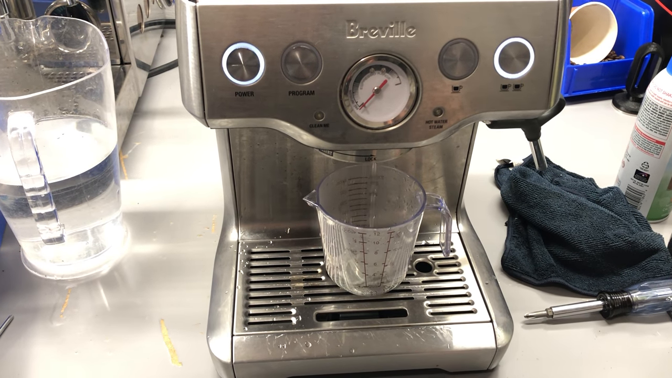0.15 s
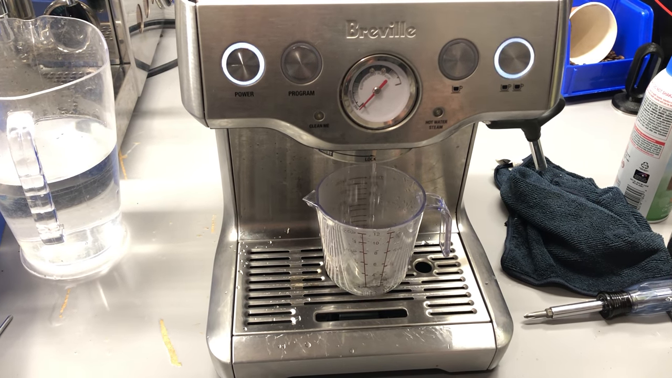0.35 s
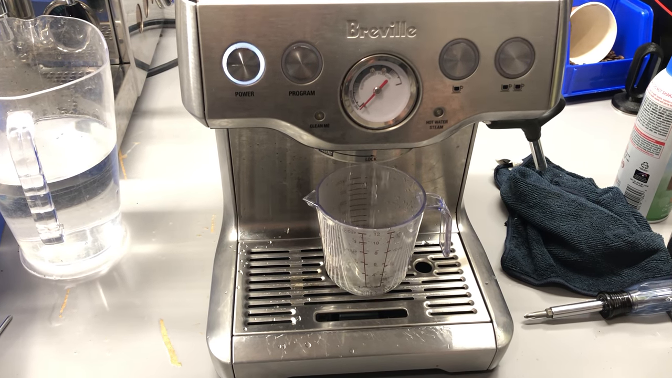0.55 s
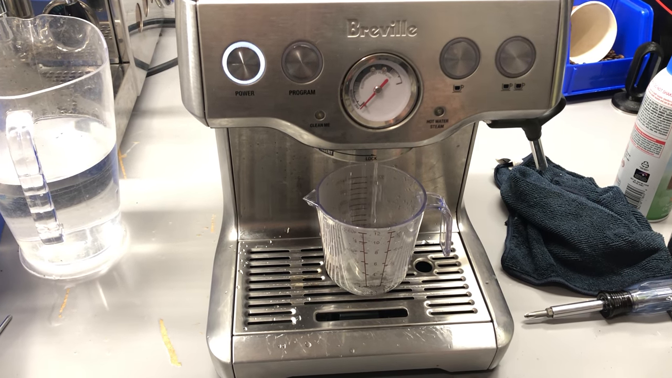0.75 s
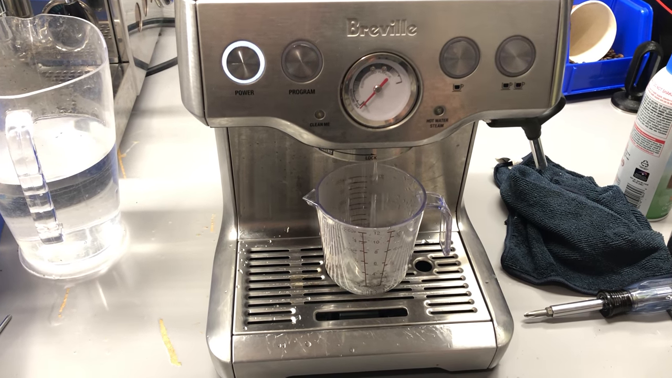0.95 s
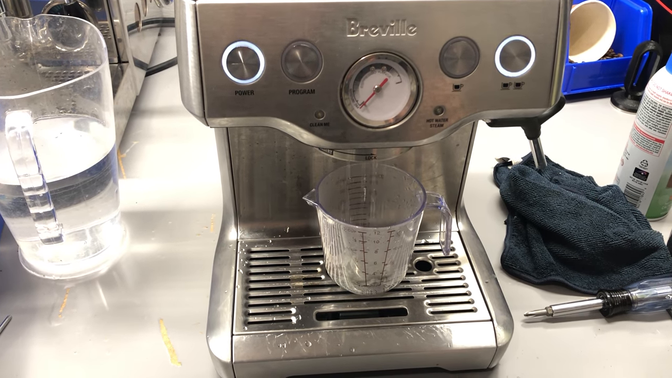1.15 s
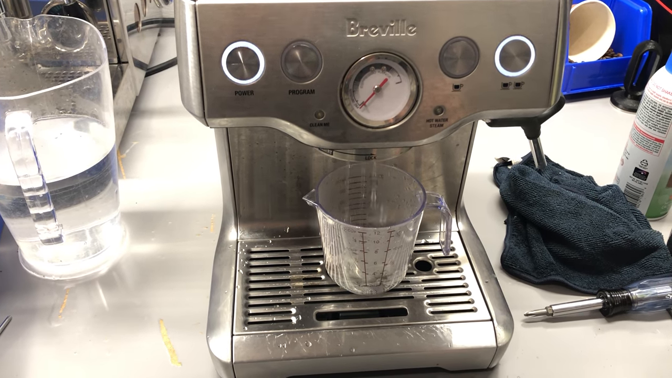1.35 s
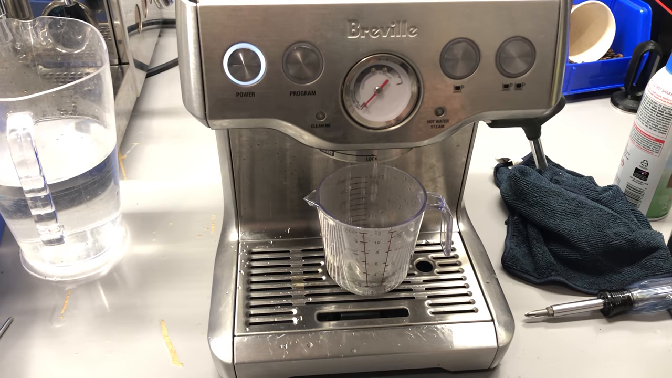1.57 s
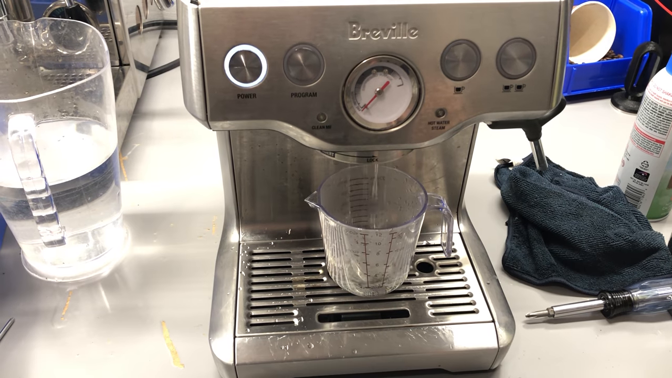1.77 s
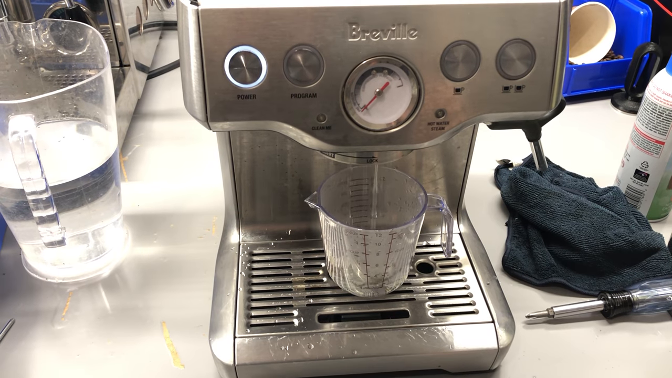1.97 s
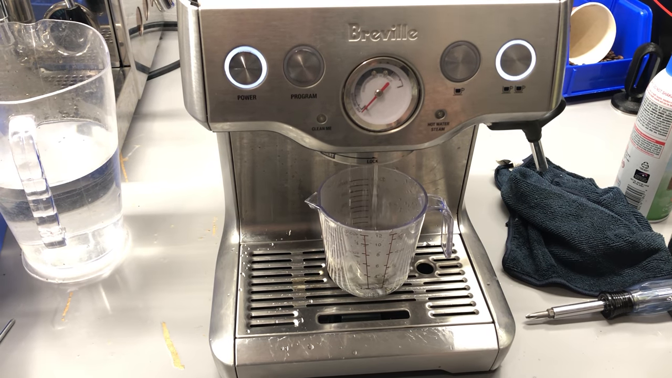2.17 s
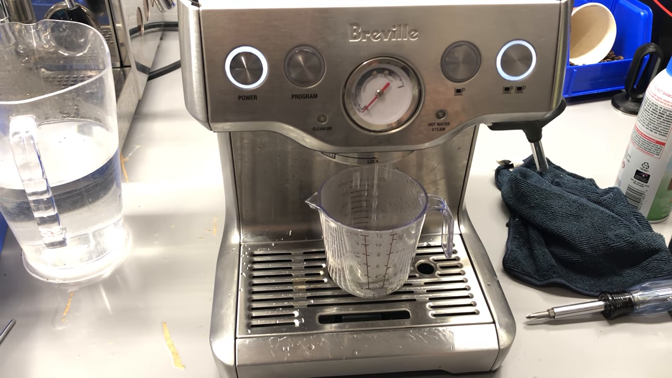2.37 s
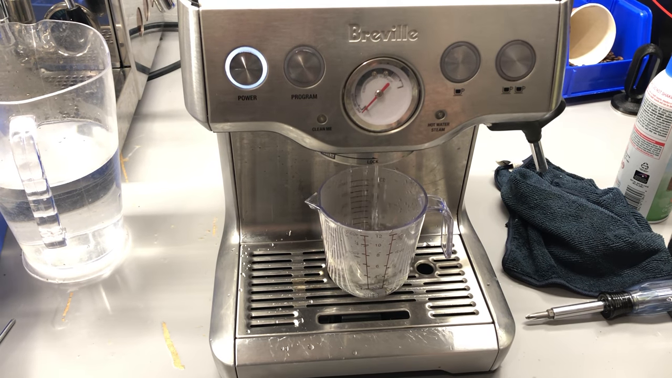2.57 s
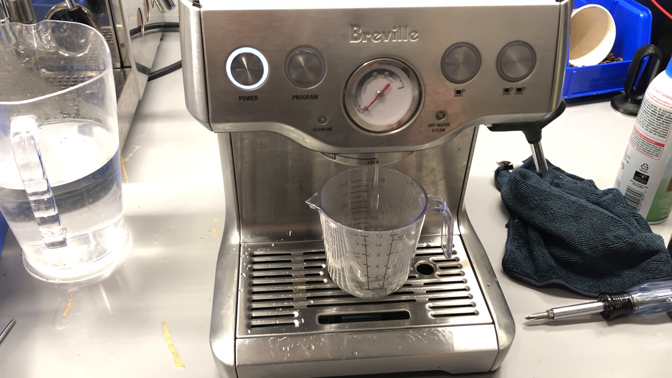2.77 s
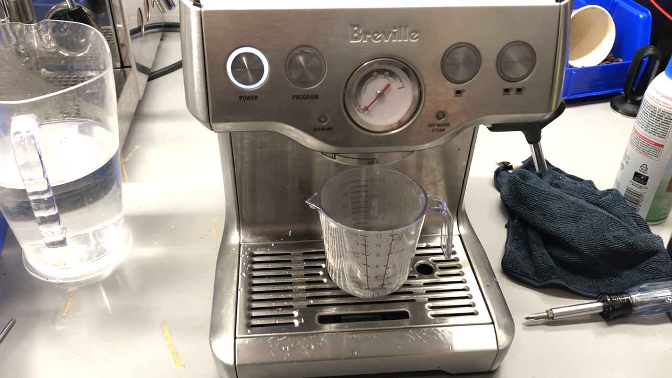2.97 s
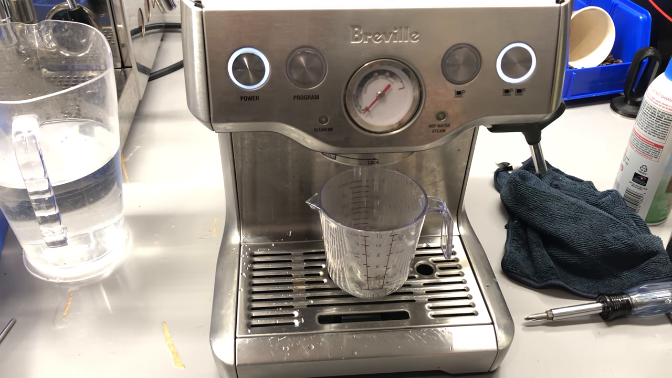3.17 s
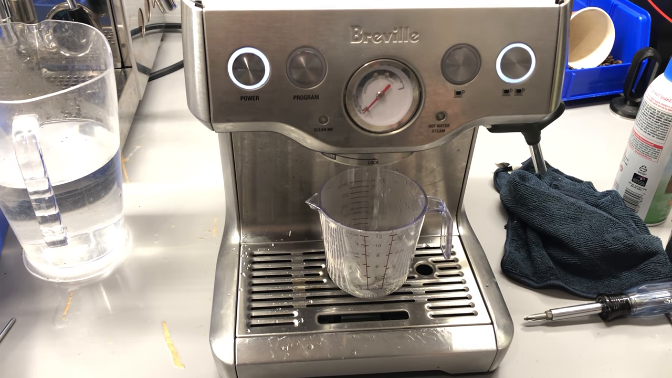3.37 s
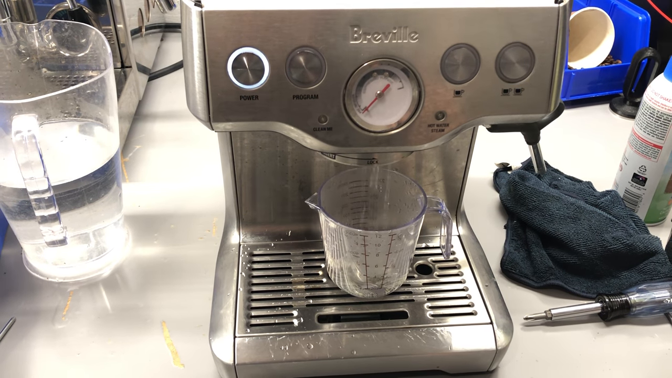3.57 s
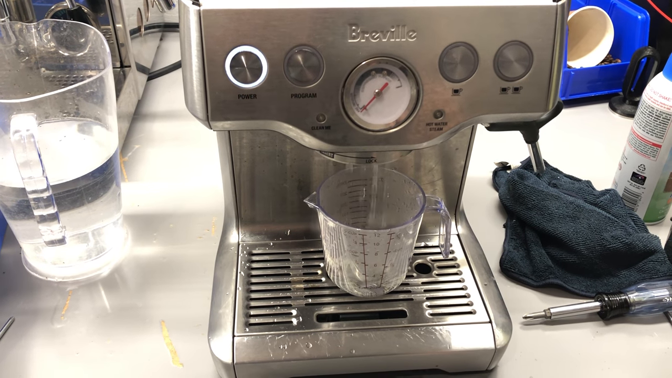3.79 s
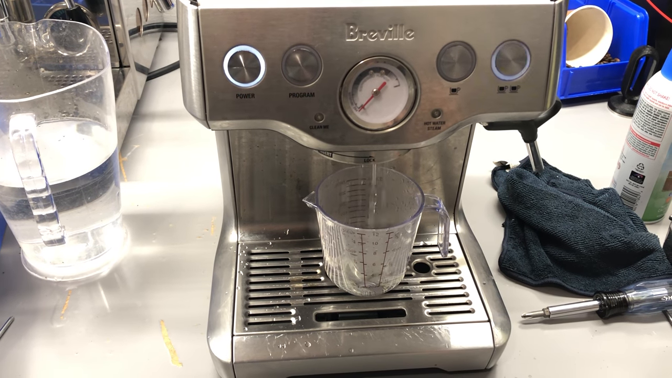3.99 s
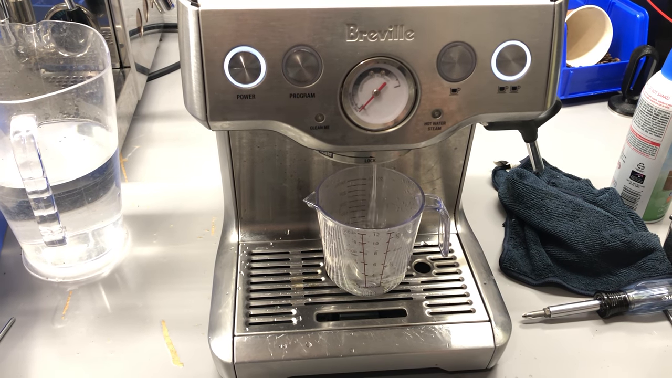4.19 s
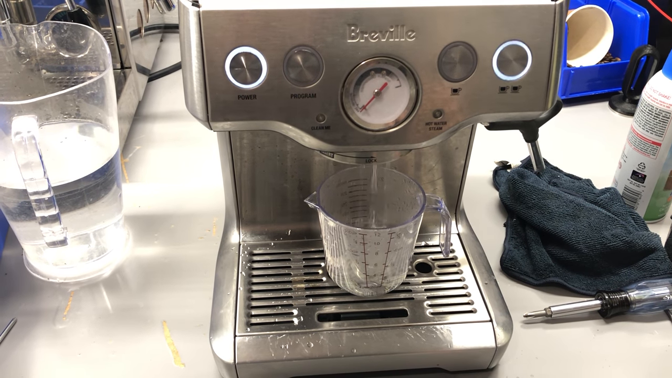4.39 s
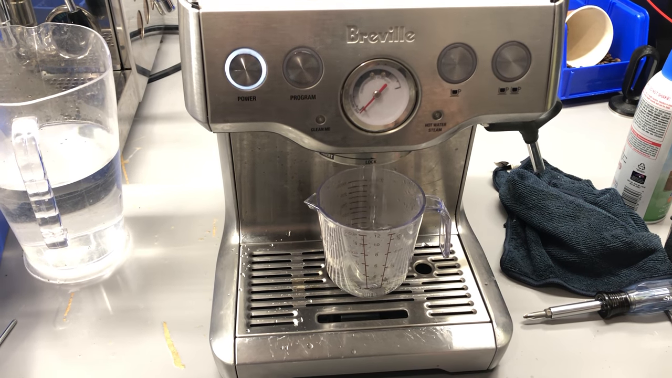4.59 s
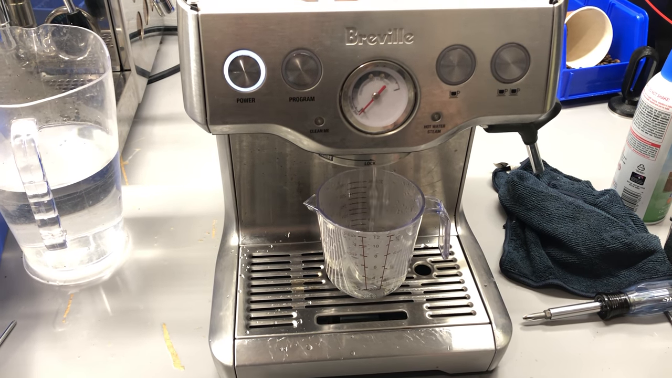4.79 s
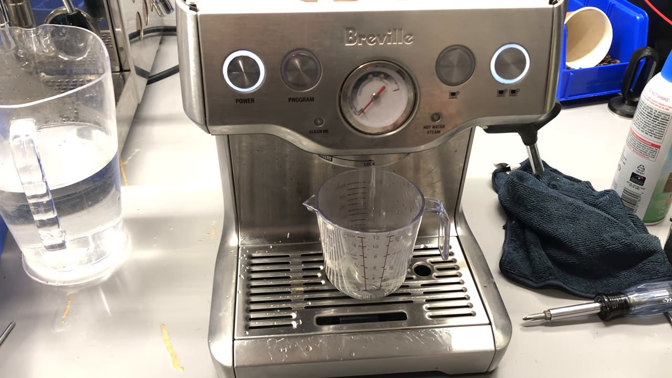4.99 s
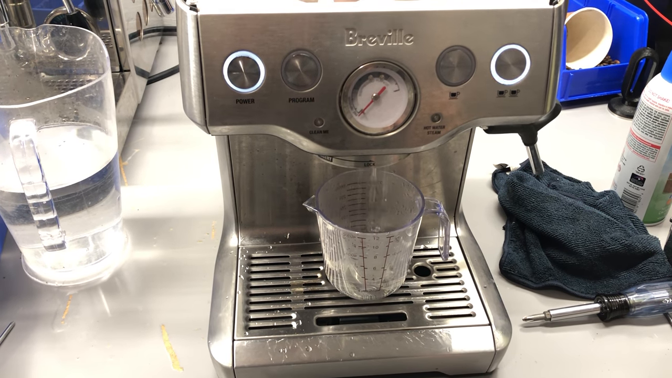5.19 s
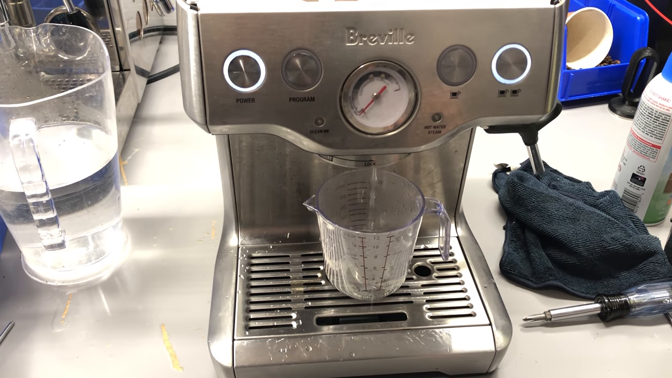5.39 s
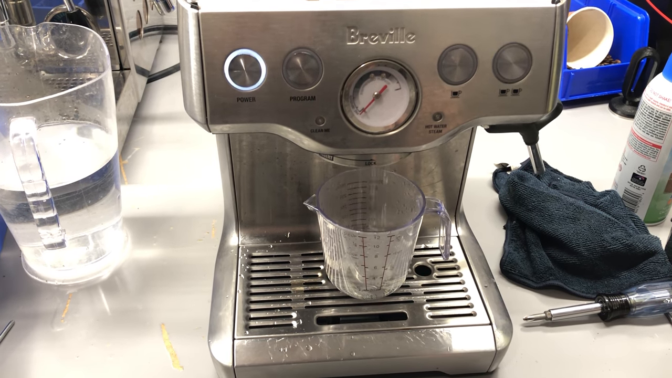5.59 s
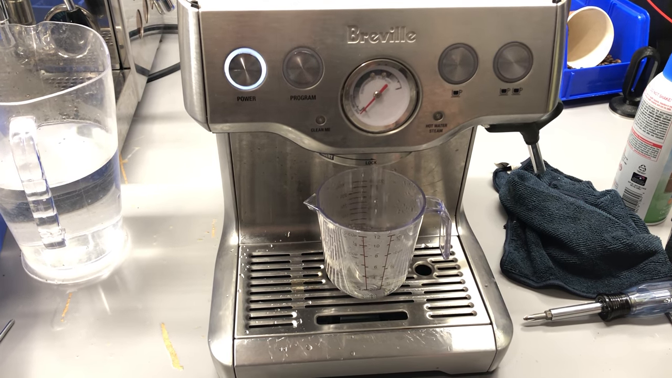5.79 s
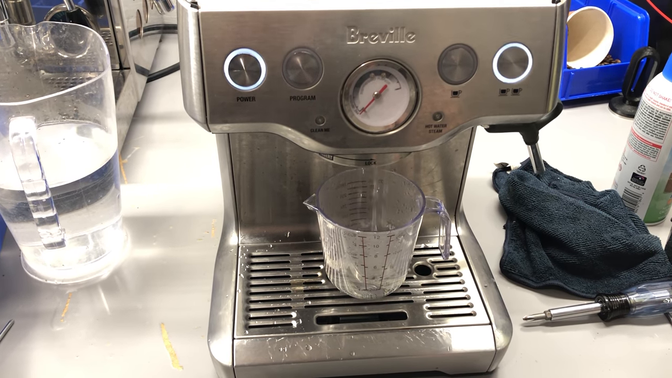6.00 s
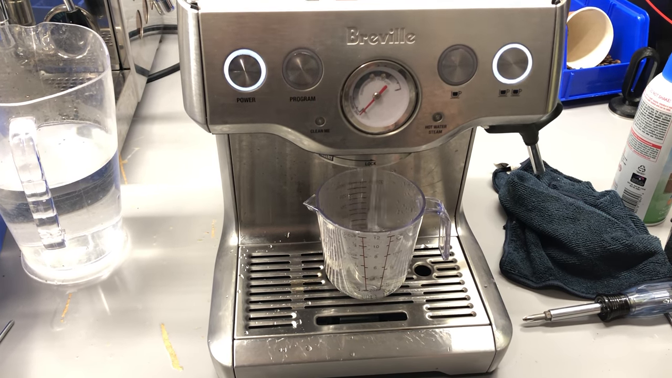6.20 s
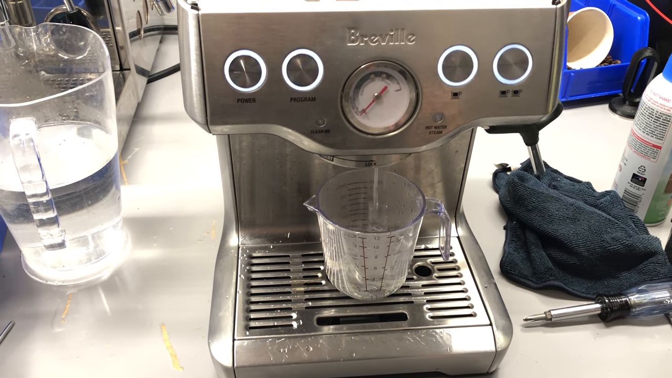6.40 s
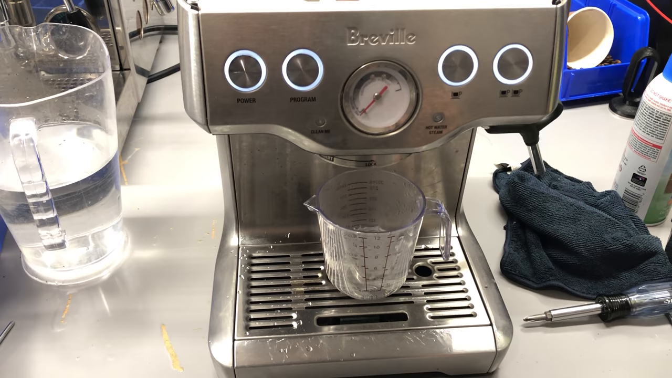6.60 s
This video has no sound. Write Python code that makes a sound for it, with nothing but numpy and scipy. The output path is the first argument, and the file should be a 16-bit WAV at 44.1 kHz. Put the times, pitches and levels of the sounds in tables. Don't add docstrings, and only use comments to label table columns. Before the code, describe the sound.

An espresso machine's vibration pump buzzes steadily with metallic rattle and hissing water, then cuts off abruptly with a dull thunk and sharp relay click.

```python
import sys
import numpy as np
from scipy import signal
from scipy.io import wavfile

SR = 44100
rng = np.random.default_rng(int(sys.argv[2]) if len(sys.argv) > 2 else 0)


def invert_db(level):
    return 10 ** (np.asarray(level, dtype=float) / 20)


def to_wav(s):
    ch = np.atleast_2d(s).T
    pcm = np.round(np.clip(ch, -1, 1) * 32767)
    wavfile.write(sys.argv[1], SR, pcm.astype(np.int16))


N = 293265
T = np.arange(N) / SR
MAINS_HZ = 60
CYCLE = SR // MAINS_HZ
STOP_S = 6.354
HEATER_ON_S, HEATER_OFF_S, HEATER_TURN_RAD = 2.232, 3.885, 0.95
HUM_DB, HUM_LOADED_DB = -39, -39.5
HUM_FADE_S, PANEL_FADE_S = 0.039, 0.004
MOUNT_ORDER, COAST_S, COAST_FADE_S = 4, 0.016, 0.02
FRONT_MS, SIDE_MS, FRAME_MS, TRAY_MS = 15.1, 10.7, 12.5, 11.0
FRAME_DB, FRAME_FOLLOWS = -45, 0.68
SIDE_DB, SIDE_FOLLOWS, SIDE_WARMUP_DB, SIDE_WARMUP_S = -39.5, -0.15, -3.5, 0.91
GRILLE_REST_DB, RIM_REST_DB, BOUT_GAIN, FLUTTER_DB = -47.5, -44.5, 1.07, 0.95
WATER_DB, WATER_SAG_DB_PER_S, WATER_FADE_S = -37.5, 0.2, 0.014
CHATTER_MEMORY, HISS_MEMORY = 0.6, 0.18
VALVE_S, VALVE_DB, RELAY_S, RELAY_DB = 6.430, -24, 6.508, -20
CRACK_DB, CRACK_T60_S = -7, 0.013
ROOM_DB, AIR_DB, TOP_HZ = -12, -57, 15800

# multiple of mains, level in dB before the heater, with it on, after it.
CASE_ORDERS = [(1, -0.5, -1, -0.5), (2, -9.5, -10.5, -10), (3, -23.5, -24, -25.5), (4, -11, -10.5, -11.5),
               (5, -2, -1.5, -2), (6, -9.5, -6.5, -8.5), (7, -23.5, -18, -18.5), (8, -18.5, -15, -17.5),
               (9, -17, -17.5, -21.5), (10, -6.5, -7.5, -6.5), (11, -7.5, -18.5, -13),
               (12, -12, -8.5, -7.5), (13, -13, -10.5, -10), (14, -13.5, -19, -10), (15, -16.5, -19, -19),
               (16, -11.5, -14, -11)]
# multiple of mains, level in dB before the heater, with it on, after it.
FRONT_ORDERS = [(17, -8.5, -25, -21), (18, 0, 0.5, -2.5), (19, 0, -3, -0.5), (20, -2, -1.5, -5.5),
                (21, -14, -9, -4.5), (22, -18.5, -31, -22)]
# multiple of mains, level in dB before the heater, with it on, after it.
SIDE_ORDERS = [(23, -17, -9, -11.5), (24, -9, -15.5, -22), (25, -5, -16, -11), (26, -24, -33, -18),
               (27, -2.5, -1.5, -5), (28, -5.5, -3, -3), (29, -0.5, -1.5, -1.5), (30, -9, -5.5, -4.5),
               (31, -7, -14, -7.5), (32, -8.5, -12, -3), (33, -20, -36, -19), (34, -10, -8, -9.5),
               (35, -11, -12, -14), (36, -21, -30, -32), (37, -21, -32, -18)]
# time in seconds, level in dB.
FRONT_DRIVE = [(0.0, -31.5), (0.03, -31), (1.25, -35.5), (1.8, -35), (1.89, -38.5), (2.07, -33),
               (2.62, -39), (2.79, -33), (2.95, -38), (3.27, -38.5), (3.31, -46), (3.54, -37.5),
               (3.78, -38.5), (4.1, -34), (5.43, -38), (5.45, -40.5), (6.33, -41.5), (6.35, -40)]
# frequency in Hz, level in dB, T60 in seconds.
FRONT_MODES = [(1103, -1, 0.032), (1176, 6, 0.032), (1350, -7, 0.028), (900, -8, 0.1)]
# frequency in Hz, level in dB, T60 in seconds.
SIDE_MODES = [(1655, -6, 0.068), (1760, 13, 0.049), (1833, 2, 0.068), (1534, 6, 0.051), (2076, -1, 0.031)]
# frequency in Hz, level in dB, T60 in seconds.
FRAME_MODES = [(2234, 1, 0.036), (2479, -5, 0.039), (2660, -2.5, 0.066), (2804, 5.5, 0.02),
               (3030, -4.5, 0.11), (3219, -7.5, 0.075), (3278, 2.5, 0.045)]
# frequency in Hz, level in dB, T60 in seconds.
RIM_MODES = [(4070, 2, .018), (4290, -1, .016), (5090, -17, .025), (4750, -17, .025)]
# frequency in Hz, level in dB, T60 in seconds.
GRILLE_MODES = [(3670, 0, .016), (3760, -5, .014)]
# centre in seconds, length in seconds, grille and rim in dB over rest.
TRAY_BOUTS = [(0.28, 0.068, 4, 0.5), (0.58, 0.29, 5, 1.8), (0.806, 0.098, 7.5, -1), (1.2, 0.67, 4.7, 4),
              (1.38, 0.16, 2.5, 0), (1.7, 0.15, 1.5, 1.5), (2.02, 0.6, 8, 3.5), (2.18, 0.098, 2, 4.5),
              (2.6, 0.08, 4.5, 1.1), (2.663, 0.57, 4.5, 4), (3.006, 0.08, 2, 7), (3.263, 0.091, 1.1, 3.5),
              (3.46, 0.55, 4.5, 2.5), (3.576, 0.096, 4, 3.5), (3.86, 0.17, 1.7, 4), (4.203, 0.19, 6.5, 4),
              (4.34, 0.57, 5, 4), (4.533, 0.11, -1, 3.5), (4.677, 0.22, 2.6, 1.5), (4.945, 0.066, 1, 6),
              (5.21, 0.65, 2, 5.5), (5.72, 0.073, 3, -1.0), (5.825, 0.13, 1.9, 7), (6.06, 0.72, -0.2, 2),
              (6.15, 0.095, 6, 4.5), (6.328, 0.091, 11.5, 2)]
# frequency in Hz, density in dB per Hz.
WATER_SPECTRUM = [(60, -12), (170, -7), (450, -3), (800, 5), (1100, 9), (1700, 10.5), (2400, 2),
                  (4000, 2.5), (5500, -2), (7500, -5), (10000, -6.5), (12500, -1.5), (14500, -3.5),
                  (16000, -4)]
# time into the cycle in ms, level in dB.
WATER_SPURT = [(0, -1), (3, -2.5), (5.5, -3.5), (6.5, 3.5), (11, 2), (12.5, 7), (14, 2), (16.6, -1)]
# frequency in Hz, level in dB, T60 in seconds.
VALVE_MODES = [(398, -7, 0.21), (443, -13, 0.093), (940, 6.5, 0.011), (323, -10, .05), (510, -8, 0.031),
               (590, -8, 0.025), (726, -7, 0.061), (827, -8, 0.07), (1260, -7, 0.024), (1610, -19, 0.046),
               (2360, -14, .03)]
# frequency in Hz, level in dB, T60 in seconds.
RELAY_MODES = [(1146, 5, 0.027), (1346, -12, 0.06), (748, -12, 0.071), (400, -18, 0.24), (1074, -9, 0.065),
               (1480, -15, .04), (196, -20, .08), (302, -17.5, 0.12), (1610, -11.5, 0.036),
               (2170, -5, 0.02), (3880, -6, 0.02)]
# frequency in Hz, density in dB per Hz.
CRACK_SPECTRUM = [(150, 3), (600, 8.5), (1200, 1), (3000, -7.5), (5000, -6), (6200, -14), (8500, -7),
                  (11400, 3.5), (14000, -1), (17000, -16)]
# time in seconds, peak in dB, frequency in Hz, T60 in seconds.
TICKS_AND_DROPS = [(3.082, -34, 2210, .025), (4.128, -22, 1240, 0.027), (4.213, -21, 1124, 0.05),
                   (6.415, -37, 1600, .02), (6.422, -44, 6070, 0.011), (6.421, -29, 9500, .001),
                   (6.421, -32, 13500, .001), (6.429, -42, 13000, .002), (6.431, -52, 9600, .003),
                   (6.428, -37, 11100, .004), (6.426, -31, 4430, 0.0097), (6.481, -52, 6000, .001),
                   (6.487, -54, 13000, .001), (6.569, -44, 5730, .012), (6.585, -40, 1200, .02),
                   (6.599, -26, 10000, .0015), (6.601, -37, 8500, .003), (6.602, -44, 13000, .002),
                   (6.603, -27, 3960, 0.0065), (6.623, -32, 14000, .003), (6.624, -45, 11000, .002)]
# time in seconds, level in dB, frequency in Hz, T60 in seconds.
COUNTER_BUMPS = [
    (6.435, -47, 72, .2),
    (6.515, -52, 80, .3),
]
# frequency in Hz, T60 in seconds.
ROOM_DECAY = [(200, 0.32), (1000, 0.46), (4000, 0.38), (12000, 0.12)]
# frequency in Hz, density in dB per Hz.
AIR_SPECTRUM = [(40, 0), (80, 4.5), (140, -4.5), (300, -0.5), (600, -12), (1200, -16), (2600, -13),
                (4000, -18), (6500, -18), (15500, -28)]


def hum():
    return orders(CASE_ORDERS, peak_ms=7.9, spread=.9, wander_db=.12, wander_rad=.02, slip_ms=.02,
                  fade_s=HUM_FADE_S)


def orders(table, peak_ms, spread, wander_db, wander_rad, slip_ms, fade_s):
    heater_on = np.clip((T - HEATER_ON_S) / 0.0098, 0, 1)
    heater_off = np.clip((T - HEATER_OFF_S) / 0.011, 0, 1)
    turn_rad = HEATER_TURN_RAD * (heater_on - heater_off)
    moment_s = T - (peak_ms + slip_ms * drift(7.1)) / 1000
    fade = np.exp(-np.maximum(T - STOP_S, 0) / fade_s)
    coast = np.exp(-np.maximum(T - STOP_S - COAST_S, 0) / COAST_FADE_S)
    middle = round(table[0][0] + table[-1][0]) / 2
    out = 0
    for k, early_db, loaded_db, late_db in table:
        k = round(k)
        settle_s = .012 * k ** 1.4
        mid = np.clip((T - HEATER_ON_S) / settle_s + 0.44, 0, 1)
        late = np.clip((T - HEATER_OFF_S) / settle_s + 0.44, 0, 1)
        level_db = (1 - mid) * (HUM_DB + early_db) + late * (HUM_DB + late_db)
        level_db = level_db + (mid - late) * (HUM_LOADED_DB + loaded_db) + wander_db * k * drift(3.9)
        phase = 2 * np.pi * k * MAINS_HZ * moment_s + spread * (k - middle) ** 2
        phase = phase + np.pi * (k < MOUNT_ORDER) + turn_rad + wander_rad * k * drift(7.5)
        envelope = coast if k < MOUNT_ORDER else fade
        out = out + np.sqrt(2) * invert_db(level_db) * np.cos(phase) * envelope
    return out


def piston():
    front_db = np.interp(T, *np.transpose(FRONT_DRIVE))
    swing_db = front_db - front_db.mean()
    warmup_db = SIDE_WARMUP_DB * np.clip(1 - T / SIDE_WARMUP_S, 0, 1)
    front_gain = invert_db(front_db - 0.7)
    side_gain = invert_db(SIDE_DB + SIDE_FOLLOWS * swing_db + warmup_db)
    frame_gain = invert_db(FRAME_DB + FRAME_FOLLOWS * swing_db)
    front = orders(FRONT_ORDERS, FRONT_MS, spread=.3, wander_db=.07, wander_rad=.01, slip_ms=.03,
                   fade_s=PANEL_FADE_S)
    side = orders(SIDE_ORDERS, SIDE_MS, spread=.06, wander_db=.05, wander_rad=.012, slip_ms=.025,
                  fade_s=PANEL_FADE_S)
    front_loose = invert_db(-13) * knocks(FRONT_MODES, FRONT_MS - 2, jitter_ms=.15, soft_ms=6, chatter_db=14,
                                    uneven_db=1.2)
    side_loose = invert_db(-11.5) * knocks(SIDE_MODES, SIDE_MS, jitter_ms=.1, soft_ms=5, chatter_db=14,
                                     uneven_db=1.2)
    frame = knocks(FRAME_MODES, FRAME_MS, jitter_ms=0.052, soft_ms=6, chatter_db=6.5, uneven_db=-2.0)
    steady = front_gain * rms_one(front) + side_gain * rms_one(side)
    loose = front_gain * front_loose + side_gain * side_loose + frame_gain * frame
    return steady, loose


def knocks(modes, at_ms, jitter_ms, soft_ms, chatter_db, uneven_db):
    burst = np.hanning(int(soft_ms * SR / 1000) + 3)
    within = np.arange(len(burst))
    strokes = np.arange(int(STOP_S * MAINS_HZ)) * CYCLE + at_ms * SR / 1000 - len(burst) / 2
    late, strength = rng.standard_normal((len(strokes), 2)).T
    at = (strokes + jitter_ms * SR / 1000 * late).astype(int)[:, None] + within
    out, push = 0, np.zeros(N)
    for hz, level_db, t60_s in modes:
        chatter = alike(rng.standard_normal(at.shape), CHATTER_MEMORY)
        contact = np.cos(2 * np.pi * hz * within / SR) + invert_db(chatter_db) * chatter
        blow_db = level_db + uneven_db * strength[:, None] + 1.2 * drift(4.6)[at]
        push[at] = burst * contact * invert_db(blow_db)
        out = out + ring(push, hz, t60_s)
    return rms_one(cut(out, 550, "high"))


def tray():
    centre_s, length_s, grille_db, rim_db = np.transpose(TRAY_BOUTS)
    slow_s = T[::64]
    swell = np.exp(-.5 * ((slow_s[:, None] - centre_s) / (.4 * length_s)) ** 2)
    grille_db = np.interp(T, slow_s, swell @ grille_db) * BOUT_GAIN + FLUTTER_DB * drift(5.6)
    rim_db = np.interp(T, slow_s, swell @ rim_db) * BOUT_GAIN + FLUTTER_DB * drift(5.6)
    rim = knocks(RIM_MODES, TRAY_MS, jitter_ms=.13, soft_ms=3, chatter_db=2, uneven_db=1.0)
    grille = knocks(GRILLE_MODES, TRAY_MS + 2.4, jitter_ms=.13, soft_ms=8, chatter_db=3, uneven_db=1.0)
    return invert_db(RIM_REST_DB + rim_db) * rim + invert_db(GRILLE_REST_DB + grille_db) * grille


def water(patchy_db, grain_db):
    spurt_db = np.interp(T * 1000 % (1000 / MAINS_HZ), *np.transpose(WATER_SPURT))
    pulse_db = spurt_db + grain_db * drift(590) + patchy_db * drift(10.0)
    out = 0
    for hz, band in bands(memory=HISS_MEMORY):
        depth = min(hz / 4000, 1)
        out = out + band * invert_db(at_hz(WATER_SPECTRUM, hz) + patchy_db * drift(5.9) + depth * pulse_db)
    fade = np.exp(-np.maximum(T - STOP_S, 0) / WATER_FADE_S)
    return invert_db(WATER_DB - WATER_SAG_DB_PER_S * T) * rms_one(out) * fade


def shut_down():
    ticks = sum(strike(s - .001, peak_db, [(hz, 0, t60_s)], soft_ms=3, grit=.7)
                for s, peak_db, hz, t60_s in TICKS_AND_DROPS)
    valve = strike(VALVE_S, VALVE_DB, VALVE_MODES, soft_ms=1.8, grit=0.099)
    bumps = sum(strike(s, level_db, [(hz, 0, t60_s)], soft_ms=20, grit=0)
                for s, level_db, hz, t60_s in COUNTER_BUMPS)
    relay = cut(strike(RELAY_S, RELAY_DB, RELAY_MODES, soft_ms=2.9, grit=.1), 152, "high")
    return cut(valve + ticks, 250, "high") + relay + bumps, crack()


def strike(at_s, level_db, modes, soft_ms, grit):
    out, start = np.zeros(N), round(at_s * SR)
    burst = np.hanning(int(soft_ms * SR / 1000) + 3)
    push = np.zeros(min(N - start, SR // 3))
    for k, (hz, mode_db, t60_s) in enumerate(modes):
        clean = np.cos(2 * np.pi * hz * np.arange(len(burst)) / SR) * 2 / burst.sum()
        rough = rng.standard_normal(len(burst)) / np.sqrt(np.sum(burst ** 2))
        push[:len(burst)] = burst * ((1 - grit) * clean + grit * rough)
        sign = (-1) ** k
        out[start:start + len(push)] += sign * invert_db(level_db + mode_db) * ring(push, hz, t60_s)
    return out


def crack():
    out, start, since_s = np.zeros(N), round(RELAY_S * SR), T[:SR // 10]
    shape = (1 - np.exp(-since_s / 0.0012)) ** 2 * invert_db(-60 * since_s / CRACK_T60_S)
    noise = sum(band * invert_db(at_hz(CRACK_SPECTRUM, hz)) for hz, band in bands(size=len(since_s)))
    out[start:start + len(since_s)] = invert_db(CRACK_DB) * shape * rms_one(noise)
    return out


def kitchen(x):
    since_s = T[:SR // 2]
    tail = sum(band * invert_db(-60 * since_s / at_hz(ROOM_DECAY, hz)) for hz, band in bands(size=SR // 2))
    tail = tail * np.clip(since_s / 0.019, 0, 1)
    before = 24 * CYCLE
    wet = signal.fftconvolve(np.concatenate([x[:before], x]), tail / np.sqrt(np.sum(tail ** 2)))
    return wet[before:before + N]


def air():
    return invert_db(AIR_DB) * rms_one(sum(band * invert_db(at_hz(AIR_SPECTRUM, hz)) for hz, band in bands()))


def ring(clicks, hz, t60_s):
    r, w = invert_db(-60 / (t60_s * SR)), 2 * np.pi * hz / SR
    return signal.lfilter([0, np.sin(w)], [1, -2 * r * np.cos(w), r * r], clicks + 1e-18)


def bands(size=N, memory=0):
    edges_hz = 40 * 2 ** np.arange(0, 9.1, 1 / 3)
    white = alike(rng.standard_normal((size // CYCLE + 1, 2, CYCLE)), memory)
    white = white.transpose(1, 0, 2).reshape(2, -1)[:, :size]
    for k, (low, high) in enumerate(zip(edges_hz, edges_hz[1:])):
        sos = signal.butter(2, [low, high], "band", fs=SR, output="sos")
        yield np.sqrt(low * high), signal.sosfilt(sos, white[k % 2])


def alike(rows, memory):
    return signal.lfilter([np.sqrt(1 - memory ** 2)], [1, -memory], rows, axis=0)


def drift(rate_hz):
    r = np.exp(-80 * np.pi * rate_hz / SR)
    slow = signal.lfilter([1], [1, -2 * r, r * r], rng.standard_normal(N // 40 + 2002))[2000:]
    return np.interp(np.arange(N) / 40, np.arange(len(slow)), rms_one(slow))


def at_hz(points, hz):
    point_hz, value = np.transpose(points)
    return np.interp(np.log(hz), np.log(point_hz), value)


def cut(x, hz, kind):
    return signal.sosfilt(signal.ellip(10, .5, 60, hz, kind, fs=SR, output="sos"), x)


def rms_one(x):
    return x / np.sqrt(np.mean(x ** 2) + 1e-20)


def scene():
    steady, loose = piston()
    rattle = tray()
    pump = loose + water(patchy_db=0.5, grain_db=1.5)
    rings, snap = shut_down()
    near = invert_db(-18) * rattle + invert_db(-17) * steady + invert_db(-14) * rings
    wet = kitchen(invert_db(ROOM_DB) * pump + invert_db(-7) * snap + near)
    dulled = cut(pump + rattle + wet + air(), TOP_HZ, "low")
    return (hum() + steady + rings + snap + dulled)[None]


def top_cut(x):
    return signal.sosfilt(signal.butter(12, 17020, fs=SR, output="sos"), x)


def record(dry):
    return top_cut(dry)


dry = scene()
out = record(dry)
to_wav(out)
```